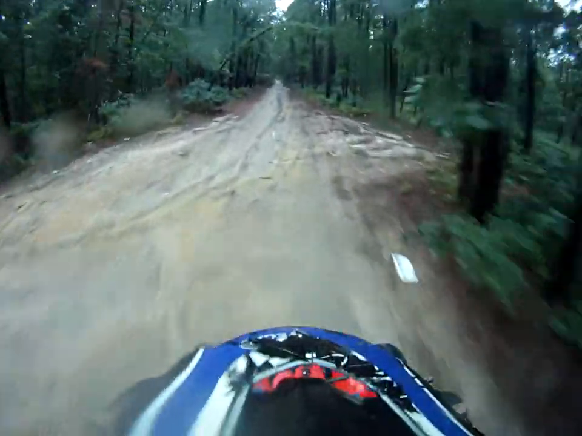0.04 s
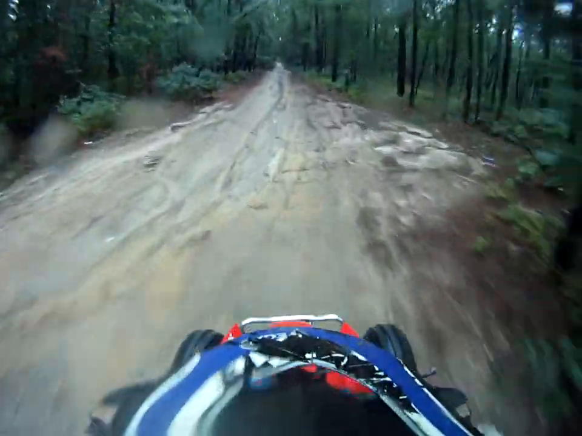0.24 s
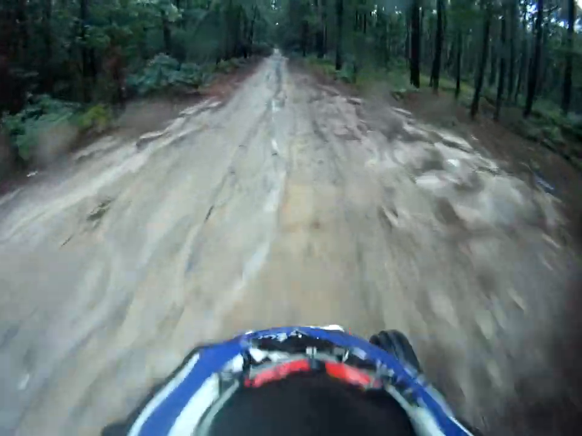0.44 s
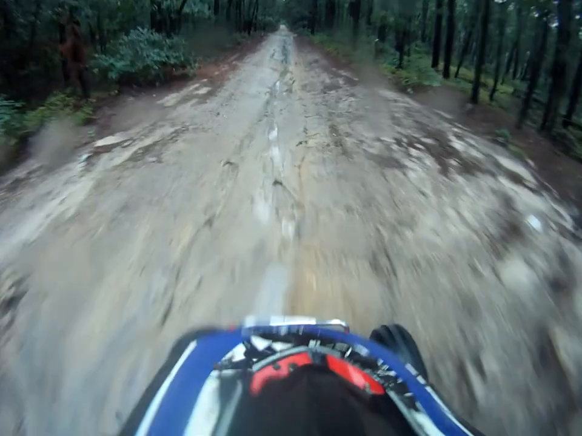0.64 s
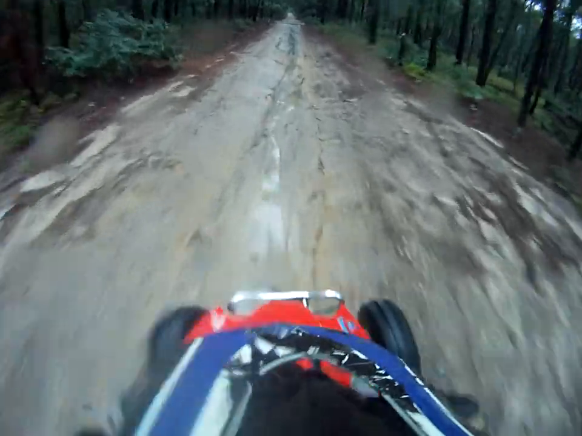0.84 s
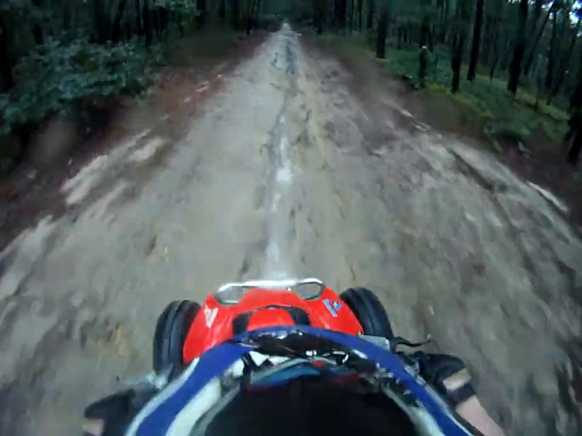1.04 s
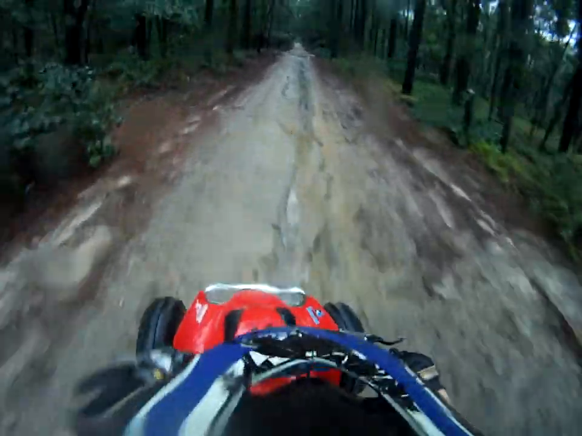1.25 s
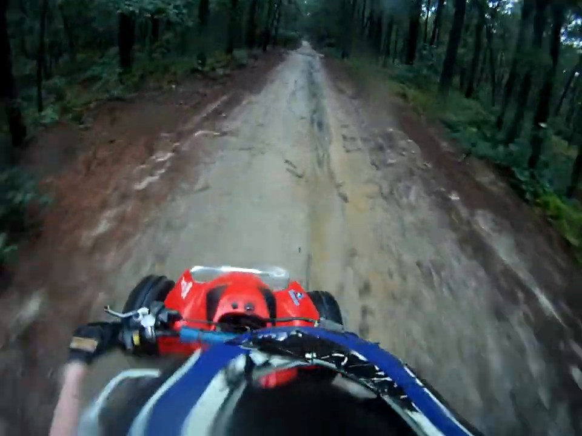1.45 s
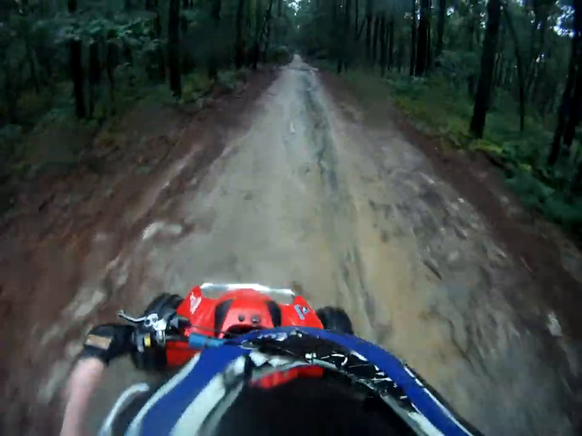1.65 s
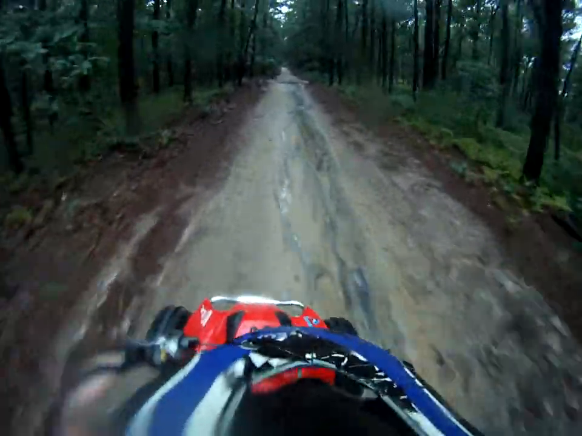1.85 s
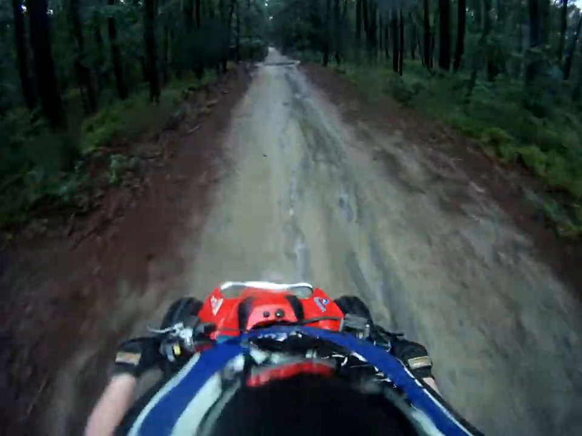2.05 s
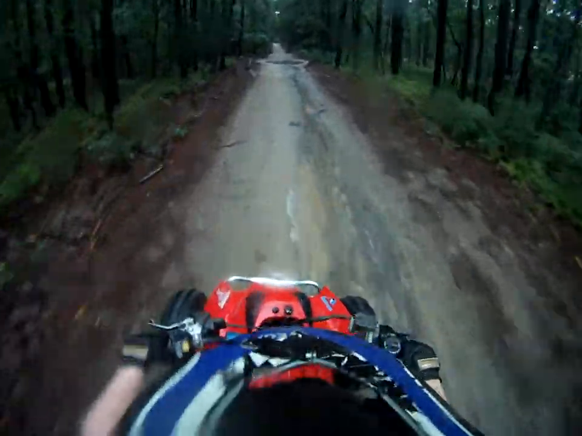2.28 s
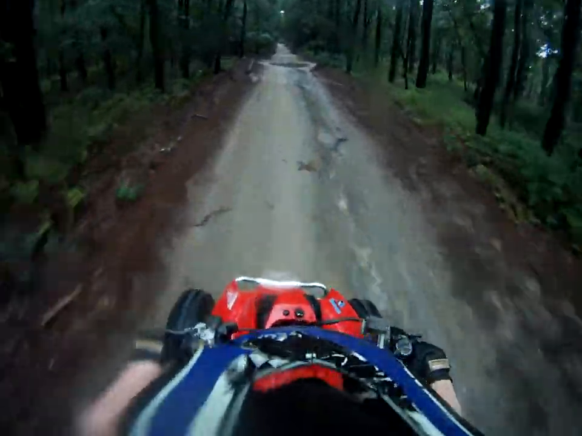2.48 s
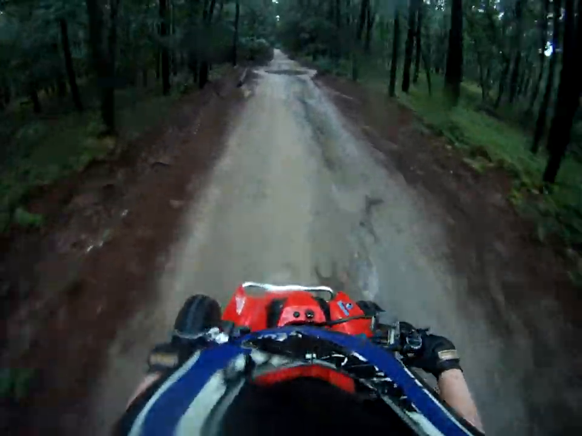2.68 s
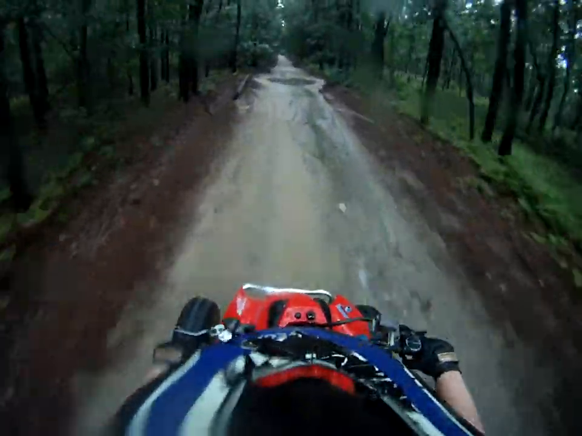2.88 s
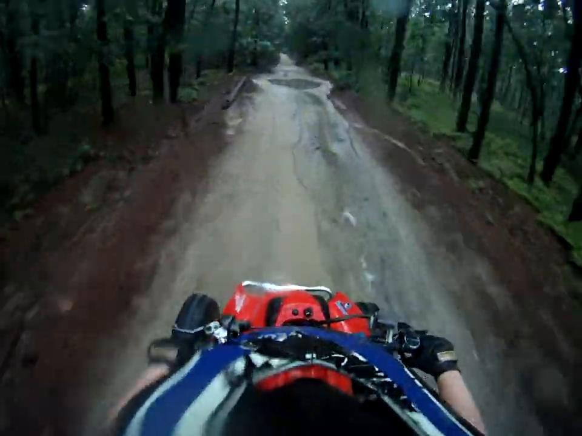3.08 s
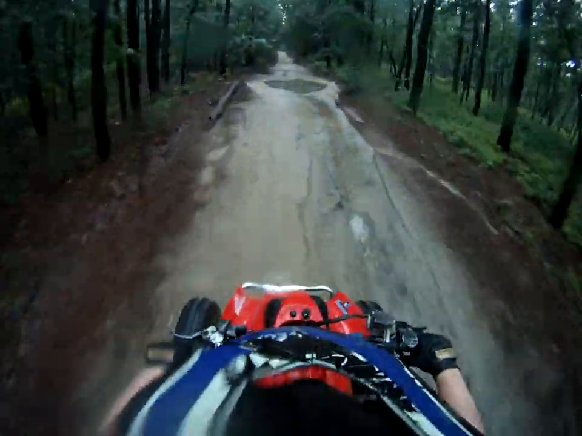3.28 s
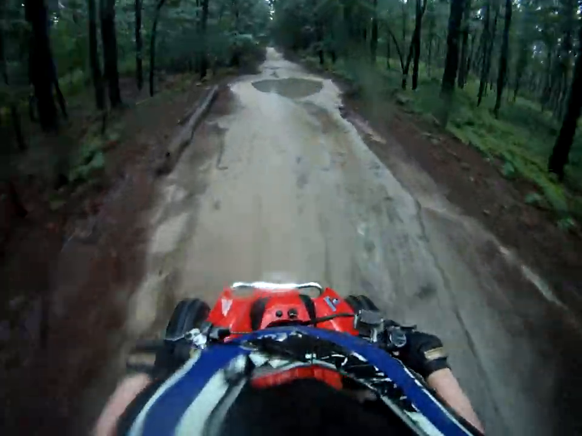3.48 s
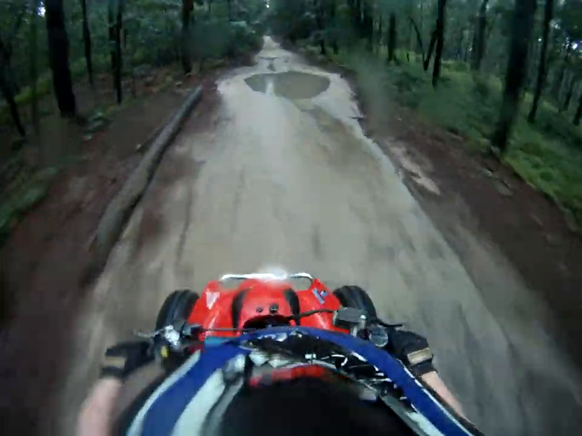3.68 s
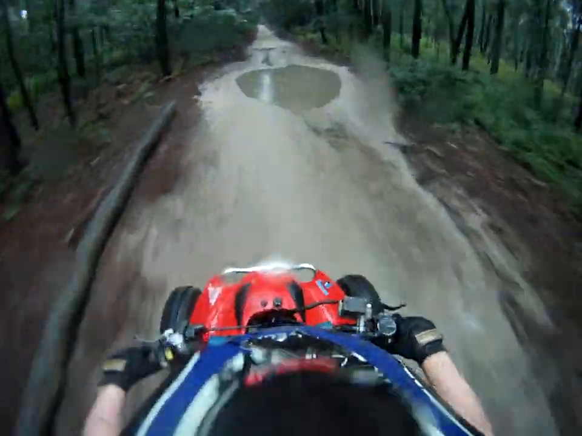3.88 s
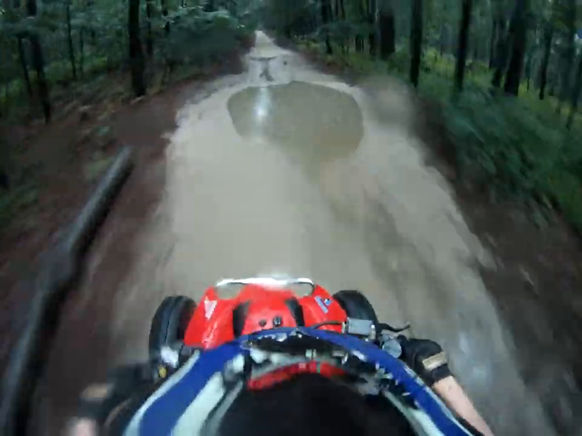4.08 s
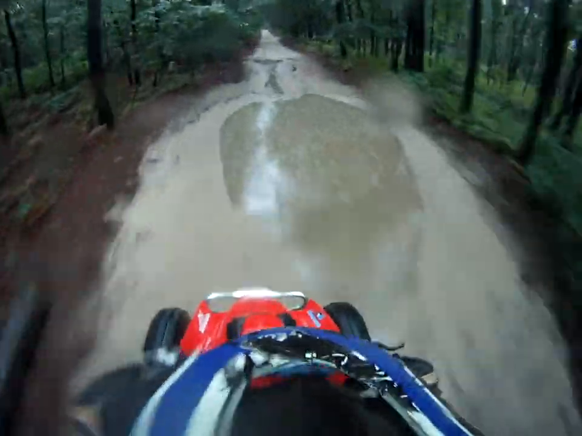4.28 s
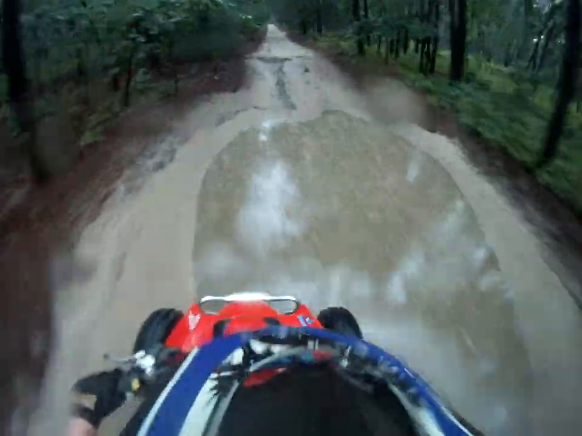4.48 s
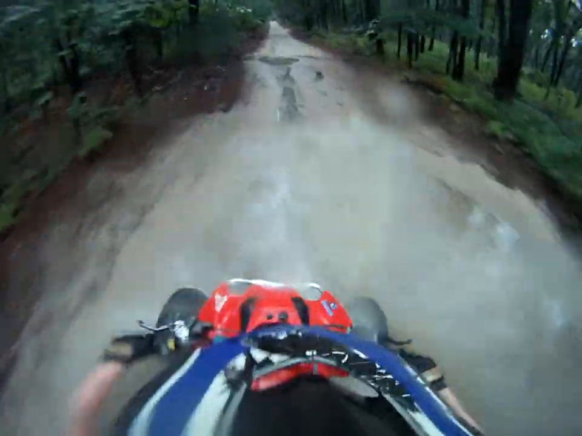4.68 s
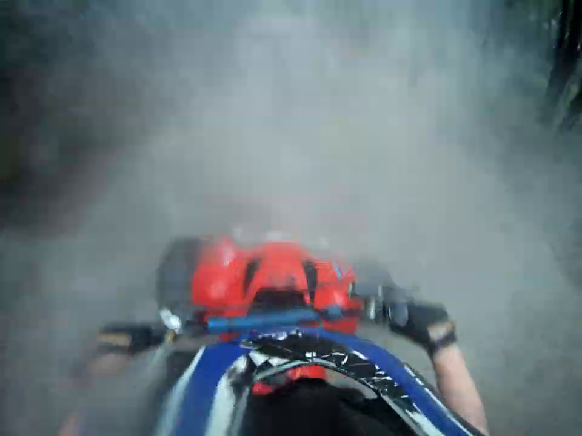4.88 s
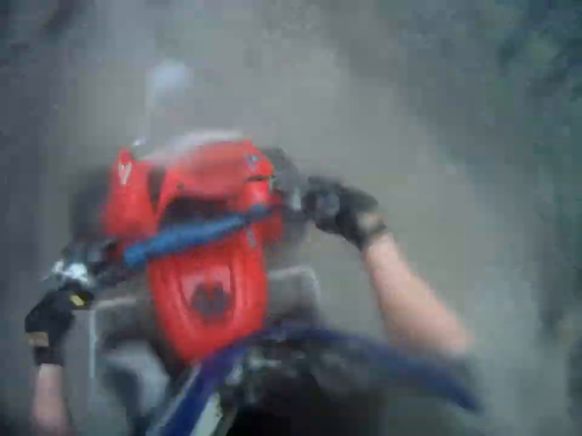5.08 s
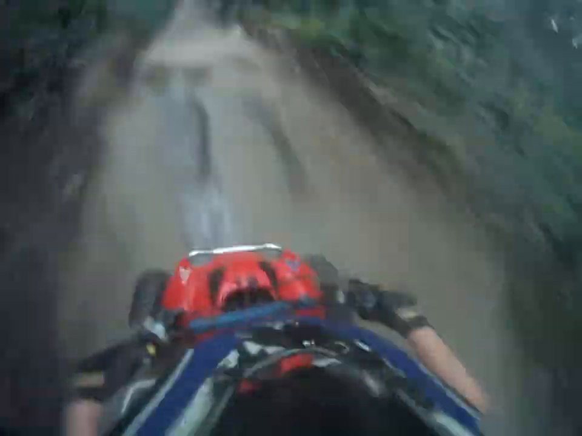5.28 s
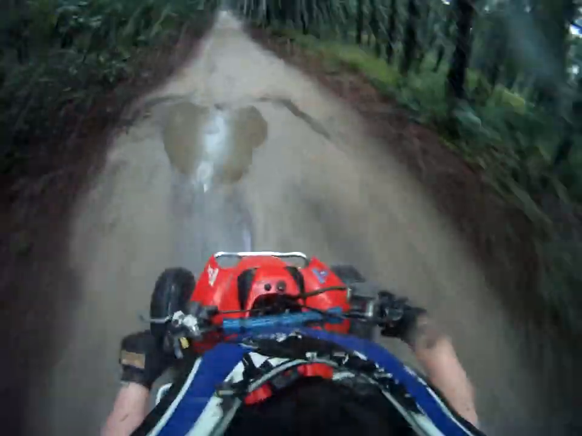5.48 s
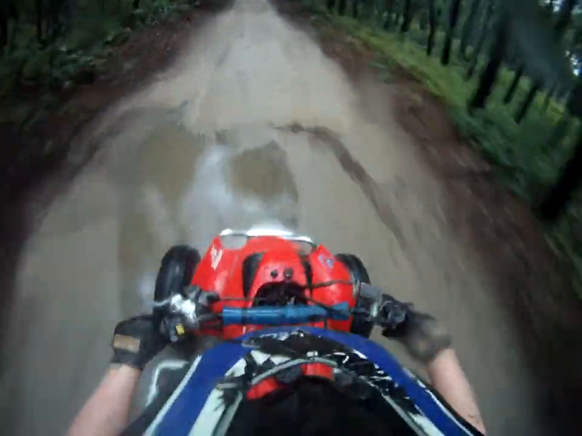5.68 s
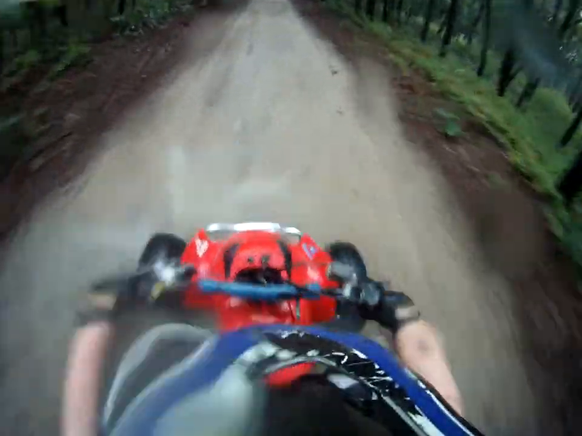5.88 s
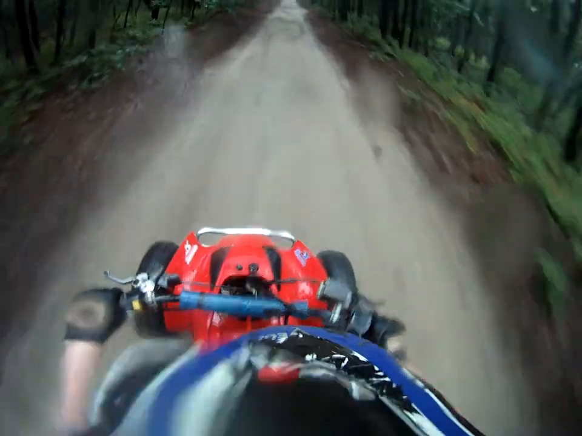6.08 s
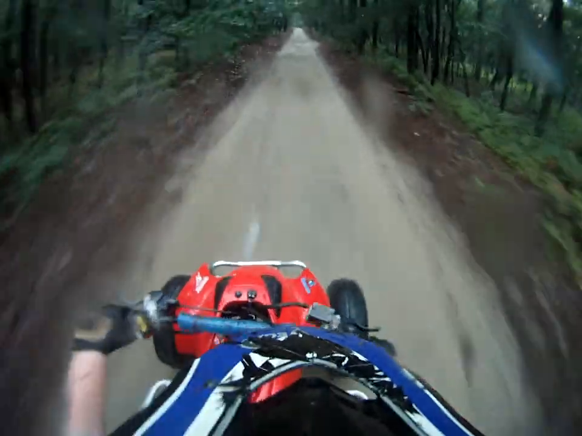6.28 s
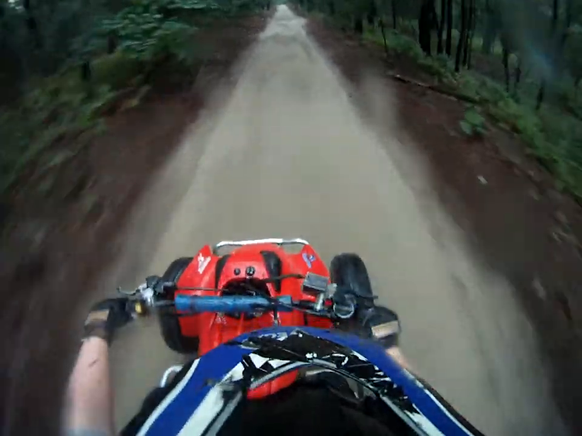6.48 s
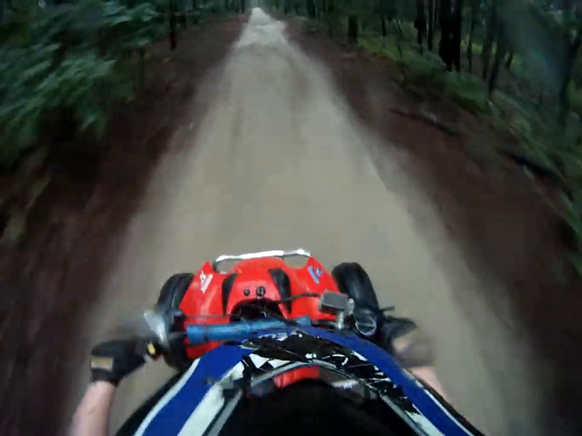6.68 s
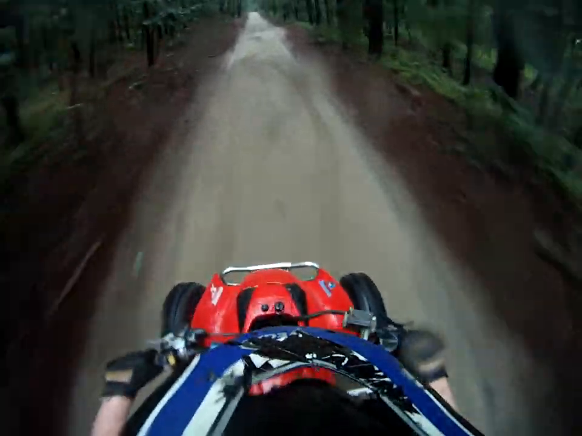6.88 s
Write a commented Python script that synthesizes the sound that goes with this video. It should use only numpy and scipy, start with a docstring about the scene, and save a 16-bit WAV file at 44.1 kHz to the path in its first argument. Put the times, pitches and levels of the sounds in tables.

```python
"""A single-cylinder four-stroke quad on a wet dirt trail, close up from a helmet camera in a plastic case.
Exhaust pulses ring the pipe over wind and tyre rumble. The throttle shuts, opens, then holds while drops
and grit tick on the case. At 4.5 s it opens wide through a puddle: water drums on the fenders, spray and
mud knock on the case, stones on the frame. At 6.5 s the suspension bottoms out with a thud.
The hardest knocks overload the recorder and its limiter ducks the engine."""
import sys
import numpy as np
from scipy import signal
from scipy.io import wavfile
from scipy.ndimage import uniform_filter1d

SR = 44100
rng = np.random.default_rng(int(sys.argv[2]) if len(sys.argv) > 2 else 0)


def pcm_store(signal):
    """Save signal as 16-bit PCM."""
    levels = np.round(np.clip(np.atleast_2d(signal), -1, 1) * 32767)
    wavfile.write(sys.argv[1], SR, levels.astype(np.int16).T)


N = 306054


def from_db(db):
    """Decibels to gain."""
    return 10 ** (np.asarray(db) / 20)


def in_time(rows):
    """Join (time_s, value) rows into a curve over all samples."""
    return np.interp(np.arange(N) / SR, *np.transpose(rows))


def evened(x):
    """Hold the running rms at 1, leaving single pulses their shape."""
    power = uniform_filter1d(uniform_filter1d(x * x, size=3600), size=2600)
    return x / np.sqrt(np.maximum(power, 1e-18))


def cut(x, hz, kind, order=2):
    """Butterworth low-pass or high-pass."""
    return signal.sosfilt(signal.butter(order, hz, kind, fs=SR, output="sos"), x)


def drift(rate_hz):
    """A smooth random wander of spread 1."""
    slow = cut(rng.standard_normal(N + SR), rate_hz, "low")[SR:]
    return slow / slow.std()


def late(x, seconds):
    """Delay, to a fraction of a sample."""
    return np.interp(np.arange(N) - seconds * SR, np.arange(N), x, left=0)


def fade(clicks, seconds):
    """Each click starts an exponential decay."""
    return signal.lfilter([1], [1, -np.exp(-1 / (seconds * SR))], clicks)


def swell(start_s, length_s, attack_s, release_s):
    """Rise, hold until the length is over, then fall."""
    t = np.arange(N) / SR - start_s
    return np.clip(np.minimum(t / attack_s, 1 - (t - length_s) / release_s), 0, 1)


def resonate(x, modes):
    """Parallel resonances, each with its own gain."""
    out = 0
    for hz, width, gain_db in modes:
        r = np.exp(-np.pi * width / SR)
        poles = [1, -2 * r * np.cos(2 * np.pi * hz / SR), r * r]
        out = out + from_db(gain_db) * (1 - r * r) / 2 * signal.lfilter([1, 0, -1], poles, x + 1e-18)
    return out


def gliding(x, modes, ratio, size=441):
    """Parallel resonances whose pitches all follow one ratio, block by block."""
    out = np.zeros(N)
    for hz, width, gain_db in modes:
        r, state = np.exp(-np.pi * width / SR), np.zeros(2)
        for i in range(0, N, size):
            poles = [1, -2 * r * np.cos(2 * np.pi * hz * ratio[i] / SR), r * r]
            block, state = signal.lfilter([1, 0, -1], poles, x[i:i + size], zi=state)
            out[i:i + size] += from_db(gain_db) * (1 - r * r) / 2 * block
    return out


def case(x):
    """The plastic shell around the microphone passes treble mainly at its own resonances."""
    # shell resonances: pitch_hz, width_hz, gain_db
    shell_modes = [(2150, 242, 17.5), (2180, 52, -1), (3350, 610, -4.5), (4960, 2500, -8.5)]
    return cut(resonate(x, shell_modes), 1080, "high")


def rumble():
    """Wind and tyres make a low, broad noise."""
    # noise bands: centre_hz, width_hz, gain_db
    bands = [(35.2, 320, -2.5), (104, 38, -9), (286, 115, 2.5), (490, 23, 4.5), (1036, 790, -10.5),
             (1420, 300, 2)]
    return evened(cut(resonate(rng.standard_normal(N), bands), 1200, "low"))


def patter(per_s, spread_db):
    """Random tiny impacts, a few bigger than the rest; rms 1."""
    sizes = from_db(spread_db * np.minimum(rng.exponential(1, N), 4)) * rng.standard_normal(N)
    clicks = sizes * (rng.random(N) < per_s / SR)
    return clicks / clicks.std()


def water(speed_db):
    """Spray patters on the case and water drums on the fenders: a bed that follows speed, plus splashes."""
    # water thrown up by the wheels: start_s, length_s, spray_db, slosh_db
    splashes = [(4.504, 0.084, -28.5, -25), (4.766, 0.2, -23.5, -22), (4.887, .14, -17.5, -34),
                (5.082, 0.26, -15, -17.5), (5.497, 0.1, -26.5, -16.5), (5.787, 0.16, -30.5, -29.5),
                (6.38, 0.043, -24.5, -31)]
    # fender resonances: pitch_hz, width_hz, gain_db
    fender_modes = [(106, 15.4, 14), (276, 310, -2), (574, 40, 1), (900, 274, 5), (1580, 180, -21.5)]
    spray_power, slosh_power = from_db(-34.5 + speed_db) ** 2, from_db(-34 + speed_db) ** 2
    for start_s, length_s, spray_db, slosh_db in splashes:
        shape = swell(start_s, length_s, attack_s=0.054, release_s=0.22)
        spray_power += (from_db(spray_db) * shape) ** 2
        slosh_power += (from_db(slosh_db) * shape) ** 2
    spray = evened(case(patter(per_s=3200, spread_db=1) + 1.22 * rng.standard_normal(N)))
    drumming = evened(resonate(patter(per_s=1500, spread_db=2), fender_modes))
    drops = case(patter(per_s=110, spread_db=5))  # thrown water falls back as separate ticks
    slosh = cut(drumming, 2000, "low", order=4) + from_db(-15) * drops / drops.std()
    return np.sqrt(spray_power) * spray + np.sqrt(slosh_power) * slosh


def trail(speed_octaves):
    """Water and rumble grow with speed, and their level flutters quickly."""
    speed_db = 15 * speed_octaves
    bed = water(speed_db) + from_db(-37.5 + speed_db) * rumble()
    return bed * from_db(drift(rate_hz=49))


def knocks(hits, part_hz, ring_width_hz, shell_db, crack_db):
    """Each hit is a short splat that rings the struck part and shakes the whole case."""
    out, t = np.zeros(N), np.arange(SR // 10) / SR
    for start_s, peak_db, t60_s, ratio in hits:
        envelope = (1 - np.exp(-t / 0.00026)) * from_db(-60 * t / t60_s)
        envelope /= envelope.max()
        splat = envelope * rng.standard_normal(len(t))
        tone = envelope * np.sin(2 * np.pi * part_hz * ratio * t)
        body, shell = resonate(splat, [(part_hz * ratio, ring_width_hz, 0)]), case(splat)
        crack = from_db(crack_db + min(peak_db, 0)) * splat  # only the hardest hits crack brightly
        hit = tone + 0.87 * body / abs(body).max() + from_db(shell_db) * shell / abs(shell).max() + crack
        start = int(start_s * SR)
        out[start:start + len(t)] += (from_db(peak_db) * hit / abs(hit).max())[:N - start]
    return out


def grit(per_s=3.4, peak_db=-20, spread_db=6, t60_s=0.013, scatter_octaves=0.24):
    """Fine grit flies at random moments, as rows of small hits."""
    chance = rng.random((int(per_s * N / SR), 3))
    return [(when * N / SR, peak_db + spread_db * (2 * size - 1), t60_s,
             2 ** (scatter_octaves * (pitch - .5))) for when, size, pitch in chance]


def spats():
    """Drops, mud and grit strike the case, right at the microphone."""
    # drops and mud: start_s, peak_db, t60_s, pitch_ratio
    hits = [(.088, -20.5, 0.018, 1.03), (.217, -11.5, 0.047, 0.9), (.232, -10, 0.015, 0.98),
            (.438, -16.5, 0.024, 0.91), (2.155, -11, 0.042, 1), (2.2322, -13, 0.0047, 0.84),
            (2.955, -15, 0.023, .74), (3.02, -10.5, 0.017, 1), (3.3895, -6.5, 0.0056, 1.26),
            (3.7357, -10, 0.018, 0.88), (4.123, -15.5, 0.056, 0.97), (4.934, -2.5, .009, 1.08),
            (4.9865, -3, 0.0043, 1.27), (5.0046, -2.5, 0.015, 1.08), (5.266, 11, 0.021, 1.06),
            (5.277, 10, 0.0047, 1.15), (5.368, 2.5, .019, 1.03), (5.376, 3, 0.0053, 1.03),
            (5.392, 5, .007, 1.8), (5.444, 1, 0.0086, 0.81), (5.5025, 2, .009, 0.74),
            (5.6595, 20.5, 0.014, .96), (6.49, 14, 0.015, 0.86), (6.6832, 1.5, 0.0098, 1.03)]
    return knocks(hits + grit(), part_hz=2243, ring_width_hz=290, shell_db=-7.5, crack_db=-14.5)


def jolts():
    """Stones and jolts ring the frame below the rider."""
    # blows to the frame: start_s, peak_db, t60_s, pitch_ratio
    hits = [(1.9582, -9, 0.0024, 1.5), (3.6165, -5.5, 0.034, 0.94), (4.199, -12, .022, 1.03),
            (5.484, -4, 0.056, 0.99), (5.5857, 9.5, .011, 0.99), (5.6195, 6.5, 0.016, 1.2),
            (5.6392, 3, .0075, 0.98), (6.488, 18.5, 0.014, 0.96)]
    return knocks(hits, part_hz=983, ring_width_hz=360, shell_db=-5, crack_db=-26)


def landing():
    """The suspension bottoms out with a thud."""
    # blow to the suspension: start_s, peak_db, t60_s, pitch_ratio
    hits = [(6.49, 7.5, 0.065, 1)]
    return knocks(hits, part_hz=138, ring_width_hz=220, shell_db=-16, crack_db=-22)


def firings(per_s, jitter_s, uneven_db):
    """One pulse every second crank turn, never quite alike in time or strength."""
    cycles = np.cumsum(per_s) / SR
    times = np.interp(np.arange(int(cycles[-1]) + 1), cycles, np.arange(N) / SR)
    timing, strength = rng.standard_normal((len(times), 2)).T
    starts = np.clip((times + jitter_s * timing) * SR, 0, N - 1).astype(int)
    pulses = np.zeros(N)
    pulses[starts] = from_db(uneven_db * strength)
    return pulses


def valves(per_s):
    """The valve gear ticks once a cycle, 6 ms after the exhaust pulse, whatever the throttle."""
    ticks = late(firings(per_s, jitter_s=0.00016, uneven_db=6), seconds=.006)
    return evened(case(fade(ticks, seconds=0.01) * rng.standard_normal(N)))


def pipe_tuning(throttle, surge_s=0.5):
    """The pipe's pitch ratio rises with a surge of hot gas and sags while the pipe is under water."""
    settled = throttle[0] + fade(throttle - throttle[0], surge_s) / (surge_s * SR)
    surge = np.maximum(throttle - settled, 0)
    chill = swell(start_s=4.63, length_s=0.32, attack_s=0.08, release_s=0.088)
    return 1.005 + 0.065 * surge - 0.096 * chill


def exhaust(per_s, throttle, speed_octaves):
    """Each blow-down rings the exhaust pipe and drives a rush of gas through the silencer."""
    # resonances of the low boom, the pipe and the silencer: pitch_hz, width_hz, gain_db
    boom_modes = [(91.6, 18.5, 27), (41.4, 5.8, -34)]
    pipe_modes = [(160, 61, 1), (287.7, 49, 7), (362.5, 34, 6), (496.8, 45.6, 4)]
    silencer_modes = [(888, 94, 4), (1110, 102, 9.5), (1422, 143, 8.5), (1430, 40, -25)]
    # the exhaust under load, at cruising speed: throttle_fraction, boom_db, drone_db, bark_db, rasp_db
    load = [(0, -29.5, -35, -43, -45), (.3, -34, -29, -38, -34.5), (.5, -31.5, -25.5, -33.5, -43),
            (.7, -27.5, -22, -25.5, -29.5), (1, -25.5, -23, -18.5, -18.5)]
    opening, *levels = np.transpose(load)
    boom_db, drone_db, bark_db, rasp_db = (np.interp(throttle, opening, db) for db in levels)
    tuning = pipe_tuning(throttle)
    pulses = firings(per_s, jitter_s=.00003, uneven_db=.7)
    echo = late(pulses, seconds=.0038)  # the pulse runs down the pipe and back, and leaves again
    strokes = pulses + 0.74 * echo
    boom = evened(cut(resonate(strokes, boom_modes), 109, "low"))
    # on a nearly shut throttle the charge stops burning and the pulses turn soft
    burning = np.clip(throttle / 0.23, 0, 1)
    puffs = burning * strokes + (1 - burning) * cut(strokes, 308, "low", order=4)
    pipe = gliding(-puffs, pipe_modes, tuning)
    drone = evened(cut(cut(pipe, 620, "low", order=4), 98, "high"))
    rush = cut(fade(pulses + 0.19 * echo, seconds=0.0051), 700, "low")
    ring = evened(gliding(-pulses - 0.49 * echo, silencer_modes, tuning))
    turbulence = evened(gliding(rush * rng.standard_normal(N), silencer_modes, tuning))
    growl = ring + .35 * turbulence
    bark = evened(cut(cut(growl, 855, "high", order=4), 1420, "low", order=4))
    # a wide throttle brings up a hard rasp that buzzes in the case
    rasp = evened(cut(case(rush * rng.standard_normal(N)), 1040, "high", order=4))
    return (from_db(boom_db) * boom + from_db(drone_db + 3 * speed_octaves) * drone
            + from_db(bark_db) * bark + from_db(rasp_db) * rasp)


def scene():
    """Engine, trail and knocks as they reach the rider's helmet, in mono."""
    # engine speed: time_s, firings_per_s
    engine_speed = [(0.0, 37.2), (0.29, 33.66), (0.59, 34.91), (0.76, 39.45), (0.84, 37.89), (1.22, 41.48),
                    (1.31, 39.41), (1.5, 40.71), (2.31, 41.81), (4.41, 42.99), (4.55, 45.36), (4.77, 51.92),
                    (4.96, 53.26), (5.03, 49.88), (5.38, 43.21), (5.59, 51.18), (5.72, 45.58),
                    (5.93, 48.81), (6.0, 46.97), (6.2, 48.52), (6.94, 48.85)]
    # the rider's thumb: time_s, throttle_fraction
    thumb = [(.06, 0.49), (.1, 0.05), (.48, 0.03), (.52, 0.51), (.575, 0.14), (.69, 0.67), (1.35, 0.64),
             (2.05, 0.51), (4.4, 0.53), (4.62, 1), (4.88, 0.92), (5.04, 0.48), (5.23, 0.63), (5.34, 0.69),
             (5.52, 0.64), (6.35, 0.7), (6.94, 0.56)]
    per_s, throttle = in_time(engine_speed), in_time(thumb)
    speed_octaves = np.log2(per_s / 42)  # zero at cruising speed
    engine = exhaust(per_s, throttle, speed_octaves) + from_db(-41) * valves(per_s)
    return (engine + trail(speed_octaves) + spats() + jolts() + landing())[None]


def microphone(x):
    """The cavity around the enclosed capsule colours the sound."""
    # cavity dips: centre_hz, width_hz, gain_db
    dips = [(746, 207, -5.5), (5040, 2200, -3.5)]
    for hz, width, gain_db in dips:
        band, gain = np.tan(np.pi * width / SR), from_db(gain_db / 2)
        centre = -2 * np.cos(2 * np.pi * hz / SR)
        zeros = [1 + band * gain, centre, 1 - band * gain]
        poles = [1 + band / gain, centre, 1 - band / gain]
        x = signal.lfilter(zeros, poles, x)
    return x


def limiter(x, threshold_db, release_db_per_s, attack_s):
    """Gain falls within milliseconds of an overload and climbs back at a steady rate."""
    over_db = np.maximum(20 * np.log10(abs(x) + 1e-9) - threshold_db, 0)
    ramp_db = release_db_per_s * np.arange(N) / SR
    duck_db = np.maximum.accumulate(over_db + ramp_db, axis=-1) - ramp_db
    return x * from_db(-fade(duck_db, attack_s) / (attack_s * SR))


def record(dry):
    """The helmet camera limits the sound, samples it at 12 kHz and clips it."""
    narrow = cut(microphone(dry), 5600, "low", order=16)
    limited = limiter(narrow, threshold_db=-2, release_db_per_s=108, attack_s=0.0065)
    samples = np.clip(signal.resample_poly(limited, 12000, SR, axis=-1), -1, 1)
    # holding each sample mirrors the sound as a thin sizzle in the treble
    held = signal.resample_poly(np.repeat(samples, 4, axis=-1), SR, 48000, axis=-1)[:, :N]
    return signal.sosfilt(signal.ellip(10, .1, 80, 15200, "low", fs=SR, output="sos"), held)


dry = scene()
out = record(dry)
pcm_store(out)
```